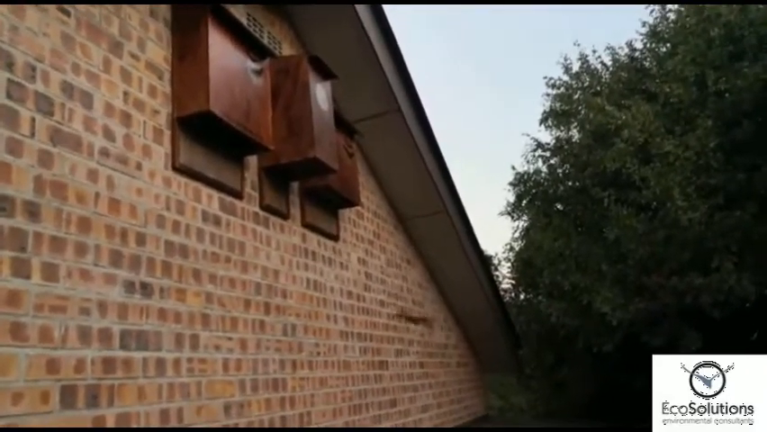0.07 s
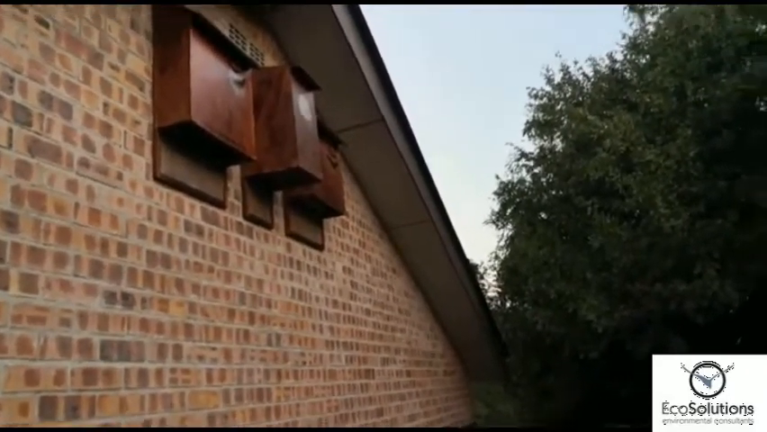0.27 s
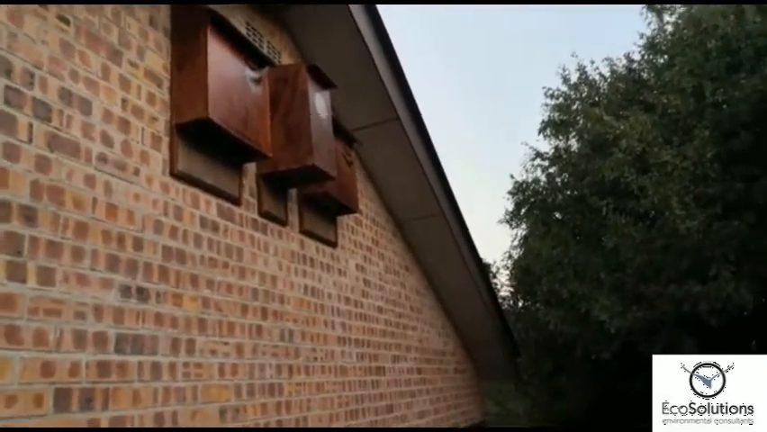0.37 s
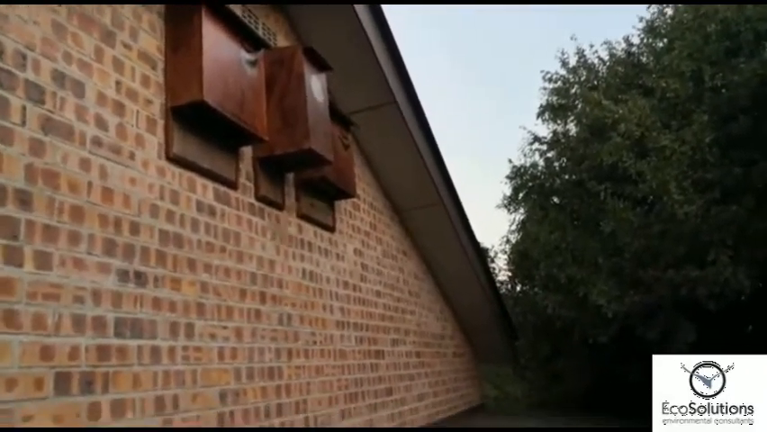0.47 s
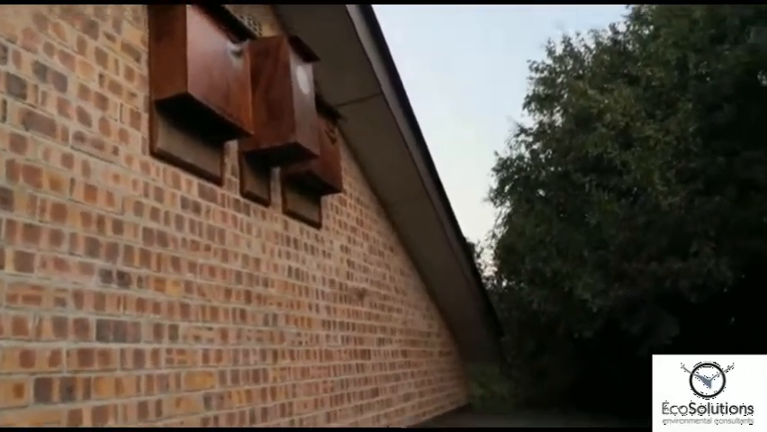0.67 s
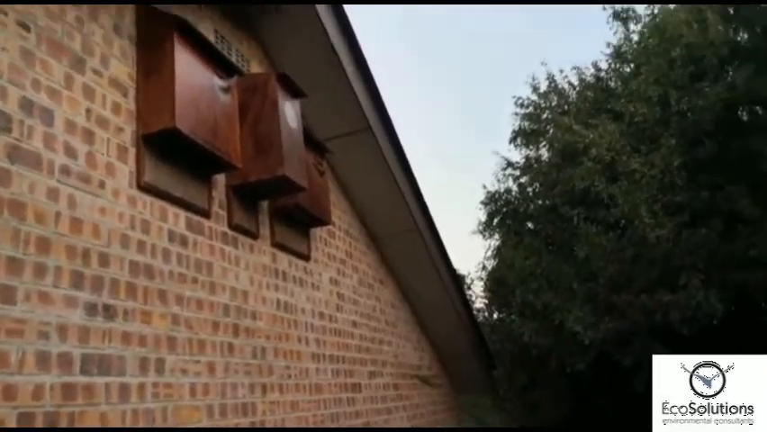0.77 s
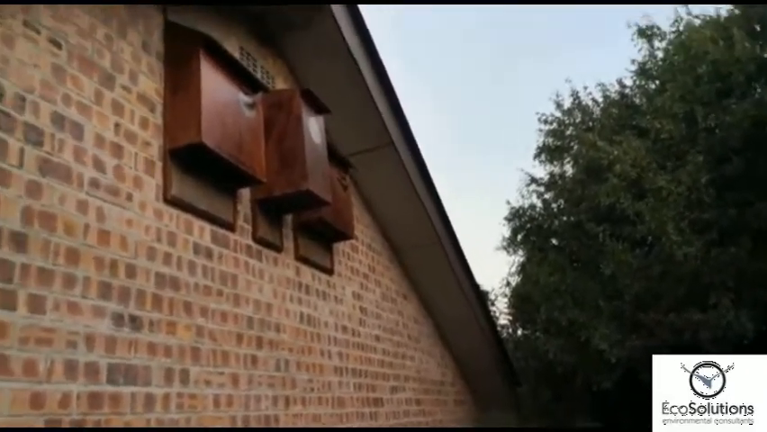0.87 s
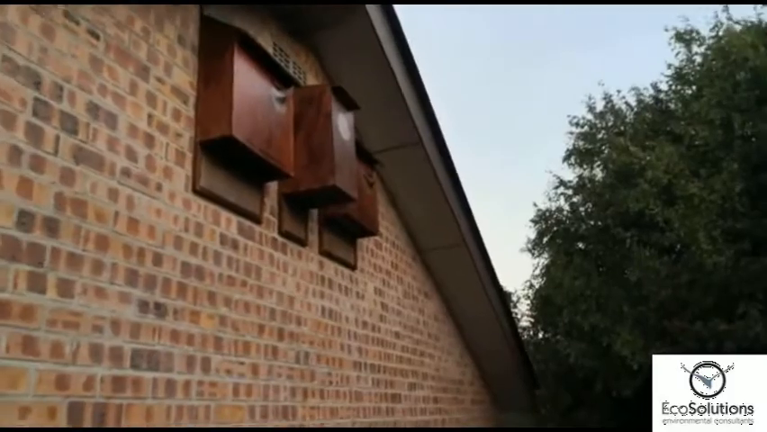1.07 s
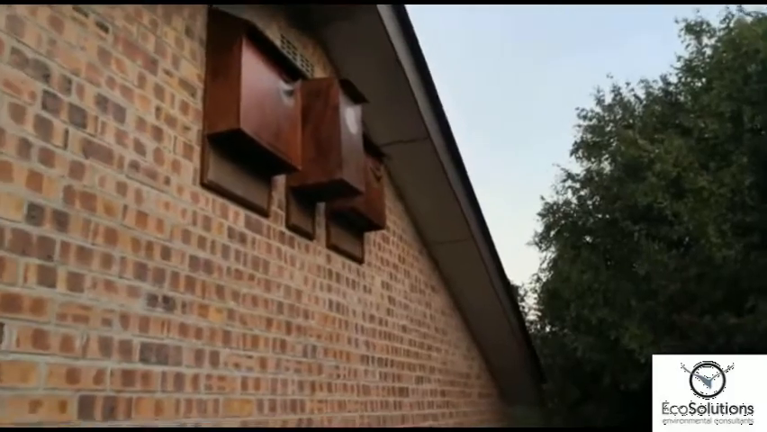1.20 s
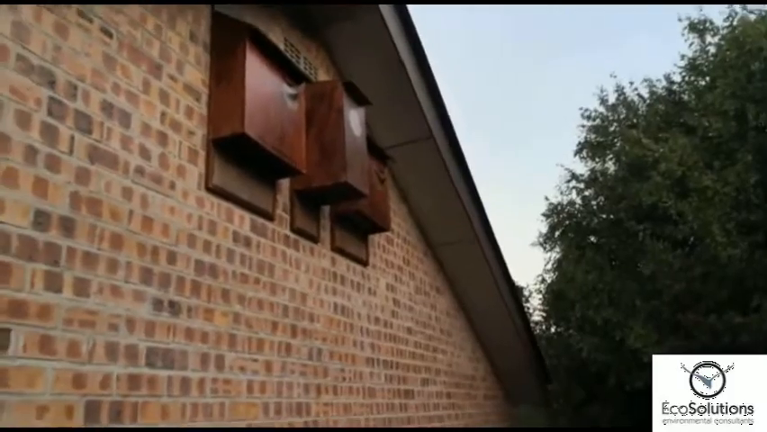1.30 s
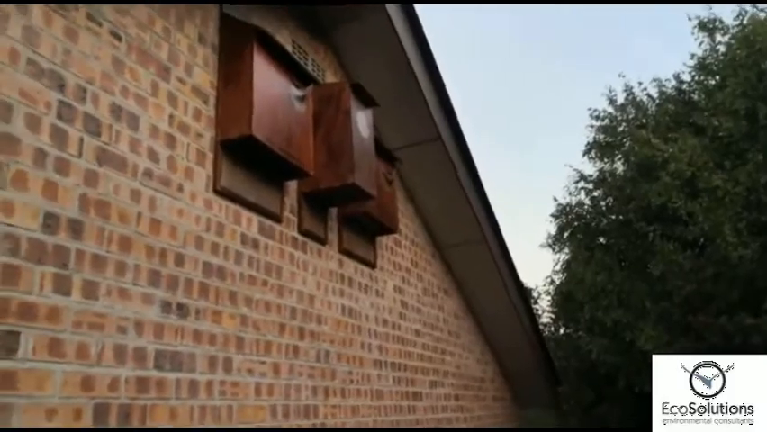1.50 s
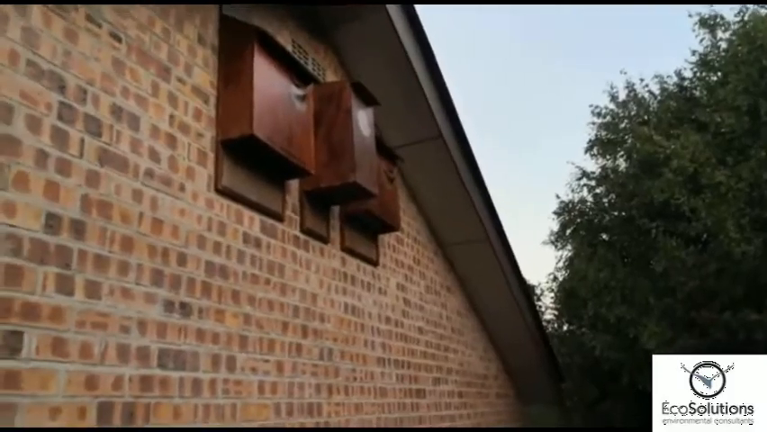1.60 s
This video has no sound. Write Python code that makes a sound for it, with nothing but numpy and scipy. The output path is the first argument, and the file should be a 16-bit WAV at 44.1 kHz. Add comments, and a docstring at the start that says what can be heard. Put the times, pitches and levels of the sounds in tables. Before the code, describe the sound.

Soft handling noise of fingers scraping and tapping near the microphone, then tiny high bat ticks.

```python
"""First comes a soft rub: fingers shift their grip on a camera held beside a brick wall. Skin slides
over the case, which rumbles as it bends, then catches and bumps next to the two microphone openings
(the ports), first the right, then the left. Bats at roost boxes overhead give faint, very short, high
chirps that scatter off the wall and eaves. The evening air is quiet."""
import sys
import numpy as np
from scipy import signal
from scipy.fft import rfft, irfft, next_fast_len
from scipy.io import wavfile
from scipy.ndimage import map_coordinates

SR = 44100
rng = np.random.default_rng(int(sys.argv[2]) if len(sys.argv) > 2 else 0)


def digitize_waveform(pressure):
    """Quantize a signal to 16-bit integers and store it at the path in sys.argv[1].

    Rows of a 2-D input are taken as channels; values are limited to [-1, 1].
    """
    field = np.atleast_2d(pressure).T
    bounded = np.clip(field, -1, 1)
    quanta = np.round(bounded * 32767).astype(np.int16)
    wavfile.write(sys.argv[1], SR, quanta)


N = 72765

# Tone of the still air: (frequency [Hz], relative level [dB])
AIR_TONE = [(120, 24), (450, -3), (1000, -25), (2300, 9.5), (4000, -17.5), (7000, 1.5), (9000, -11.5),
            (14500, -4.5)]
# Bat calls: (time [s], level [dB])
BAT_CHIRPS = [(0.08, -66), (0.2, -53), (0.623, -64), (.725, -63), (.967, -47), (1.008, -59), (1.0215, -44),
              (1.082, -52), (1.132, -55), (1.249, -46), (1.3824, -30), (1.405, -50), (1.418, -48),
              (1.4785, -42), (1.492, -28), (1.571, -36.5), (1.588, -36), (1.5975, -33)]
# Rumble of the bending case: (time [s], relative level [dB])
FLEX_LEVELS = [(0, -50), (.18, -50.5), (.23, -29), (.28, -42.5), (.38, -32.5), (.57, -33), (.6, -44.5),
               (.76, -25), (.86, -35.5), (.975, -35), (1.02, -51), (1.65, -57)]
# Tone of that rumble: (frequency [Hz], relative level [dB])
FLEX_TONE = [(70, 0.5), (160, -6.5), (300, -16), (500, -27.5), (1200, -68)]
# Relative strength of the rub:
# (time [s], left scrape [dB], right scrape [dB], left hiss [dB], right hiss [dB])
RUB_LEVELS = [(.035, -60.5, -56.5, -59, -70), (.205, -60.5, -61.5, -76, -70), (.224, -50, -35, -56, -47.5),
              (.32, -40.5, -33, -38, -46), (.365, -35.5, -21.5, -40, -33.5), (.41, -45, -38.5, -47.5, -51),
              (.455, -52, -28.5, -39, -43.5), (.495, -77, -35, -35.5, -41), (.55, -46, -39, -44, -49),
              (.61, -57, -54.5, -60.5, -56), (.675, -36.5, -35.5, -36, -57),
              (.725, -48, -37.5, -48.5, -53.5), (.755, -27.5, -40.5, -43, -58), (.86, -51.5, -50, -47, -66),
              (.95, -40, -56, -47.5, -66), (1.04, -56, -51, -63.5, -68), (1.22, -63.5, -60.5, -69, -73)]
# Tone of the rub's low scrape: (frequency [Hz], relative level [dB])
SCRAPE_TONE = [(150, 8.5), (300, 6), (1900, 1), (2700, 0.5), (4000, -25.5), (6000, -59.5)]
# Tone of the rub's high hiss: (frequency [Hz], relative level [dB])
HISS_TONE = [(1500, -1.5), (3000, 0), (4700, 1.5), (5400, 0.5), (6300, -11), (9000, -35.5)]
# Light, dry brushes of skin: (middle time [s], half length [s], level [dB], left minus right [dB])
SKIN_BRUSHES = [(0.35, 0.12, -51, -11.5), (.83, 0.0056, -54, 12), (0.949, 0.012, -49.5, 28),
                (0.886, 0.2, -66, 18), (1.277, 0.094, -68, 35)]
# Tone of those brushes: (frequency [Hz], relative level [dB])
BRUSH_TONE = [(3000, -24.5), (6000, 5.5), (7500, 3.5), (8700, -28), (14800, -10), (16000, -39)]
# Fingers catching on the case, with relative levels:
# (time [s], thump [dB], snap [dB], snap pitch [Hz], snap left minus right [dB])
FINGER_TOUCHES = [(0.1921, -25.5, -24, 2900, -16), (0.2276, -17, -17, 1130, -24),
                  (0.3959, -23.5, -35, 725, -19), (0.519, -24, -10, 1070, 36),
                  (0.566, -32.5, -23.5, 2100, -1), (0.631, -23.5, -56, 700, 11),
                  (0.6702, -13, -5, 1990, 11), (0.6827, -27, -16, 3050, 12), (0.6893, -10, -13, 845, 34),
                  (0.704, -46, -24.5, 4960, 14), (0.749, -14.5, -11.5, 2600, 31),
                  (0.7513, -11, -15, 2460, 10.5), (0.7585, -13.5, -11, 990, 25),
                  (0.7915, -15.5, -16, 1300, 12), (0.7977, -8.5, -36, 800, 21),
                  (0.8031, -14, -13.5, 780, 19), (0.8477, -.5, -6, 3600, 20), (0.8596, -5, -4, 3800, 15),
                  (0.8651, -13.5, -6.5, 940, 10.5), (0.8751, -18, -12, 1100, 1),
                  (0.8896, -49, -11, 7300, 29), (0.9168, -23.5, -15.5, 2150, 9.5),
                  (1.072, -27, -31, 1720, -26), (1.14, -38.5, -24.5, 7350, 18),
                  (1.2495, -51, -26.5, 7700, 19), (1.348, -66, -40, 7460, 28),
                  (1.4826, -43, -33, 1660, -22), (1.505, -33.5, -32.5, 1370, -26)]

BAT_PAN_DB = 29  # the bats are well to the left


def amp(db):
    """Turn decibels into a number to multiply by."""
    return 10 ** (np.asarray(db) / 20)


def unit(x):
    """Scale x to an average strength (rms) of 1."""
    return x / np.sqrt(np.mean(x ** 2) + 1e-20)


def noise(n=N):
    """White noise, different at each port."""
    return rng.standard_normal((2, n))


def curves(rows):
    """Join a table's points with lines: one curve for each column after the time."""
    times, *columns = np.transpose(rows)
    return np.array([np.interp(np.arange(N) / SR, times, column) for column in columns])


def swell(at_s, half_s):
    """A flat-topped rise and fall, reaching about half_s to each side of at_s."""
    return np.exp(-.5 * ((np.arange(N) / SR - at_s) / half_s) ** 4)


def wobble(per_s):
    """A smooth curve through per_s random points a second."""
    return map_coordinates(rng.standard_normal(2048), [np.arange(N) * per_s / SR], mode="wrap")


def lowpass(hz, edge_hz, order=2):
    """A gain that keeps the lows and fades above edge_hz."""
    return 1 / (1 + (hz / edge_hz) ** order)


def filtered(x, response):
    """Multiply each frequency in x by response(hz)."""
    n = x.shape[-1]
    padded = next_fast_len(n + 4096)
    return irfft(rfft(x, padded) * response(np.fft.rfftfreq(padded, 1 / SR)), padded)[..., :n]


def coloured(x, tone):
    """Shape x with a tone table, at strength 1."""
    points_hz, db = np.transpose(tone)
    return unit(filtered(x, lambda hz: amp(np.interp(np.log(hz + 1), np.log(points_hz), db))))


def band(x, centre_hz, width_hz):
    """The part of x around one frequency."""
    return filtered(x, lambda hz: np.exp(-((hz - centre_hz) / width_hz) ** 4))


def ports(pan_db):
    """Left and right gains; a positive pan_db makes the right weaker."""
    return amp(np.minimum([[pan_db], [-pan_db]], 0))


def across(x, edge_hz, delay_s=0.0008):
    """x as it reaches the far port, late and dull."""
    return filtered(x, lambda hz: np.exp(-2j * np.pi * hz * delay_s) * lowpass(hz, edge_hz))


def add(out, x, at_s):
    """Mix x into out, centred on at_s."""
    i = round(at_s * SR) - x.shape[-1] // 2 + np.arange(x.shape[-1])
    inside = (i >= 0) & (i < N)
    out[..., i[inside]] += x[..., inside]


def evening_air():
    """A quiet, steady outdoor hush."""
    return amp(-70.5) * coloured(noise(), AIR_TONE)


def bat_chirps(pitch_hz=14200, base_sweep_hz_per_s=4.6e6, base_width_s=.00036, echo_s=0.083):
    """Each chirp is a quick high glide lasting a millisecond or two, and it scatters off bricks and eaves."""
    out, t = np.zeros((2, N)), np.arange(-2048, 2048) / SR
    for at_s, db in BAT_CHIRPS:
        stretch = np.exp(0.5 * rng.standard_normal())  # each chirp has its own pace
        shape = np.exp(-.5 * (t / base_width_s / stretch) ** 2) / np.sqrt(stretch)
        cycles = pitch_hz * t + .5 * base_sweep_hz_per_s / stretch * t ** 2
        chirp = shape * np.sin(2 * np.pi * cycles)
        bounces = noise(len(t)) ** 3 * (t > 0) * amp(-60 * abs(t) / echo_s)
        echo = signal.fftconvolve(bounces / np.linalg.norm(bounces[0]), chirp[None], mode="same", axes=1)
        echo_db = -26.5 + 0.38 * db  # faint, distant chirps are mostly echo
        add(out, amp(db) * chirp + amp(echo_db) * echo, at_s)
    return out * ports(BAT_PAN_DB)


def bat_squeak(at_s=1, lowest_hz=10300, glide_hz_per_s=70000):
    """One thin, raspy squeak whose pitch dips and climbs again."""
    hz = lowest_hz + glide_hz_per_s * abs(np.arange(N) / SR - at_s)
    rasp = wobble(per_s=600) * np.sin(2 * np.pi * np.cumsum(hz) / SR)
    return amp(-65) * ports(BAT_PAN_DB) * swell(at_s, half_s=.012) * rasp


def case_flexing():
    """The grip bends the case: a lumpy rumble, nearly alike at both ports."""
    level_db, = curves(FLEX_LEVELS)
    shared, side = coloured(noise(), FLEX_TONE)
    rumble = shared + amp(-16) * np.array([side, -side])
    return amp(level_db - 6 + wobble(per_s=45.53)) * rumble


def friction(tone, slips_per_s=2500, spread_db=18, slip_share=0.65):
    """Sliding skin makes many tiny slips of uneven size, over smooth noise."""
    slipping = rng.random((2, N)) < slips_per_s / SR
    sizes = amp(spread_db * rng.uniform(-2.97, 0.91, (2, N)))
    slips = unit(slipping * sizes * np.sign(noise()))
    rough = np.sqrt(slip_share) * slips + np.sqrt(1 - slip_share) * noise()
    return coloured(rough, tone) * amp(wobble(per_s=170))


def finger_rubbing():
    """A finger slides over the case: a scrape, a hiss and a few brighter brushes."""
    level_db = curves(RUB_LEVELS)
    scrape = amp(level_db[:2] - 5) * friction(SCRAPE_TONE)
    scrape += across(np.flipud(scrape), edge_hz=520)  # each side carries to the other port
    # For a moment the scrape sounds hollow.
    scrape -= swell(at_s=0.439, half_s=.05) * band(scrape, centre_hz=840, width_hz=360)
    hiss = amp(level_db[2:] - 4) * friction(HISS_TONE)
    strokes = sum(swell(at_s, half_s) * amp(db) * ports(pan) for at_s, half_s, db, pan in SKIN_BRUSHES)
    return scrape + hiss + strokes * friction(BRUSH_TONE)


def port_whistle(pitch_hz=4560, width_hz=480):
    """Passing the left port, the rub narrows to a breathy near-whistle."""
    breath = unit(filtered(noise(), lambda hz: lowpass(hz - pitch_hz, width_hz)))
    return amp(-42) * ports(pan_db=20) * swell(at_s=0.453, half_s=0.023) * breath


def skin_snap(t, pitch_hz, ring_s=0.00012, grit_s=0.0035):
    """Skin lets go of the case: a tiny ring wrapped in gritty noise."""
    top_hz = 2.48 * pitch_hz
    bottom_hz = 0.12 * pitch_hz ** 2 / 3300  # the higher the snap, the thinner its lows
    after = np.maximum(t, 0)
    ring = np.sin(2 * np.pi * pitch_hz * after) * np.exp(-after / ring_s)
    grit = filtered(noise(len(t)), lambda hz: hz * lowpass(hz, pitch_hz) * lowpass(hz, top_hz, order=4))
    burst = 0.54 * np.exp(-abs(t) / (2 * ring_s)) + amp(-24) * np.exp(-abs(t) / grit_s)
    snap = ring + unit(grit) * burst
    snap = filtered(snap, lambda hz: lowpass(hz, top_hz) * (1 - lowpass(hz, bottom_hz)))
    return filtered(snap, lambda hz: 0.15 + lowpass(hz, 6790, order=18))  # soften the highest part


def finger_touches(press_s=0.00083, release_s=0.00099, leak_hz=56, sharp_above_hz=3300):
    """Skin pushes on the case and lets go with a snap; the case springs back with a thump."""
    out, t = np.zeros((2, N)), np.arange(-1024, 1024) / SR
    push = np.where(t < 0, -np.exp(-abs(t) / press_s), np.exp(-abs(t) / release_s))
    # Slow pressure changes leak away round the ports.
    push = filtered(push, lambda hz: 1j * hz / (leak_hz + 1j * hz))
    near = filtered(push, lambda hz: lowpass(hz, edge_hz=690))
    far = across(push, edge_hz=420)
    for at_s, thump_db, snap_db, pitch_hz, pan_db in FINGER_TOUCHES:
        thump = np.array([near, far] if pan_db > 0 else [far, near])
        touch = amp(thump_db) * thump + amp(snap_db) * ports(pan_db) * skin_snap(t, pitch_hz)
        if pitch_hz > sharp_above_hz:  # the sharpest touches sound hollow
            touch -= 0.75 * band(touch, centre_hz=2400, width_hz=400)
        add(out, touch, at_s)
    return out


def scene():
    """The hand on the camera in front, bats and still air behind."""
    hand = finger_touches() + finger_rubbing() + port_whistle() + case_flexing()
    return hand + bat_chirps() + bat_squeak() + evening_air()


def record(dry, top_hz=16550):
    """The camera fades the very highest sounds and keeps nothing above top_hz."""
    return filtered(dry, lambda hz: (hz < top_hz) * lowpass(hz, 15650, order=60))


dry = scene()
out = record(dry)
digitize_waveform(out)
```